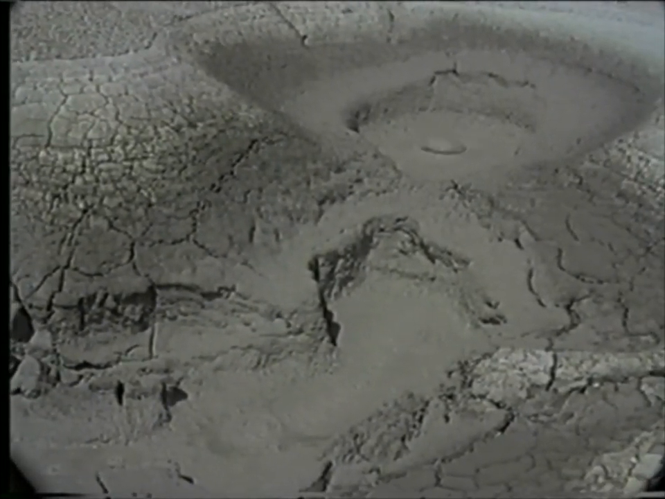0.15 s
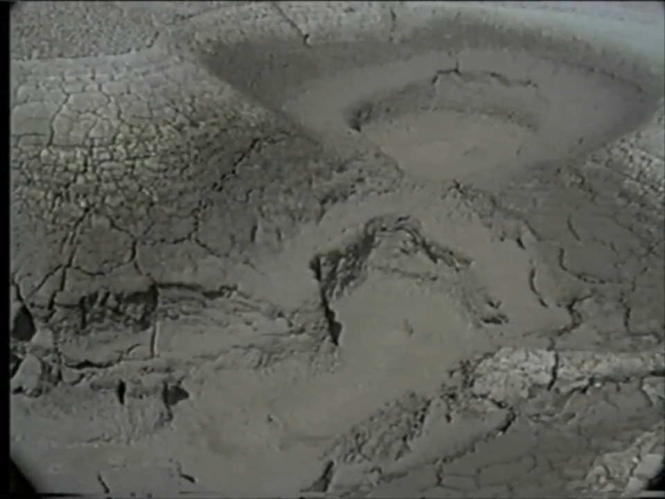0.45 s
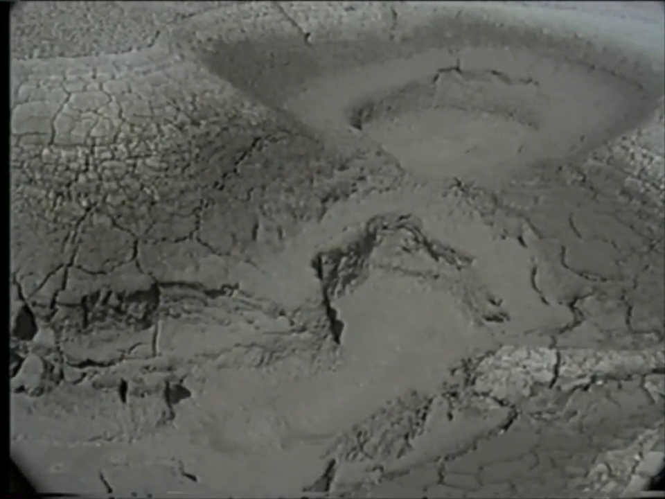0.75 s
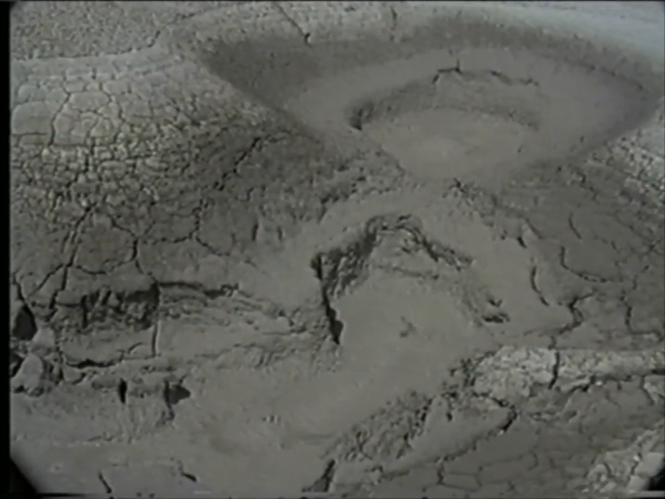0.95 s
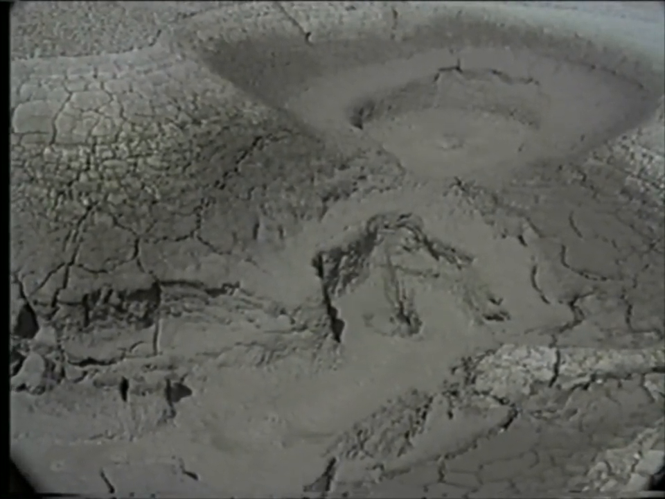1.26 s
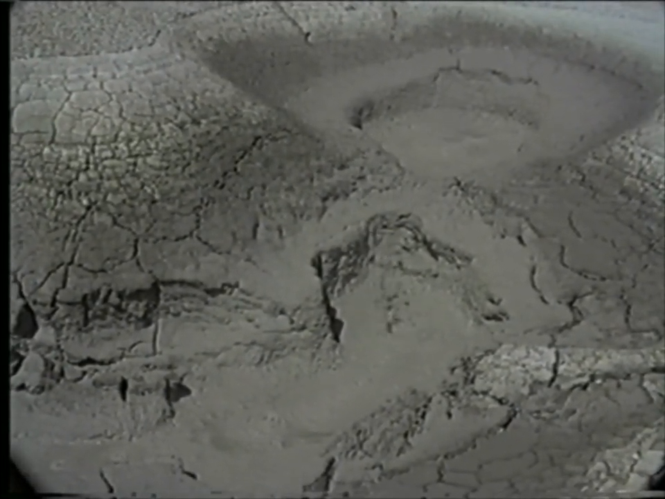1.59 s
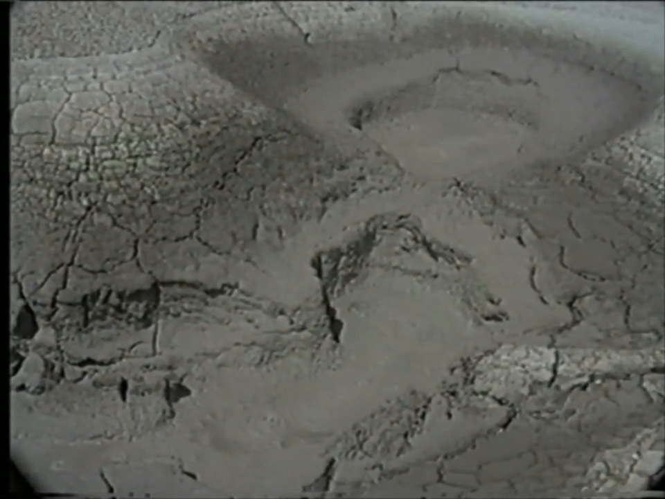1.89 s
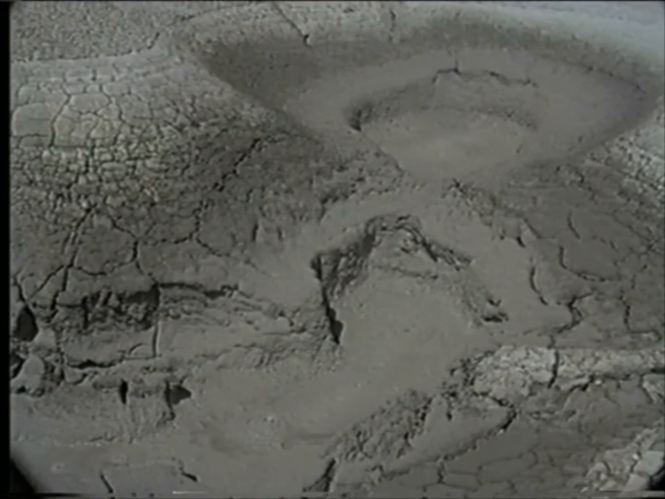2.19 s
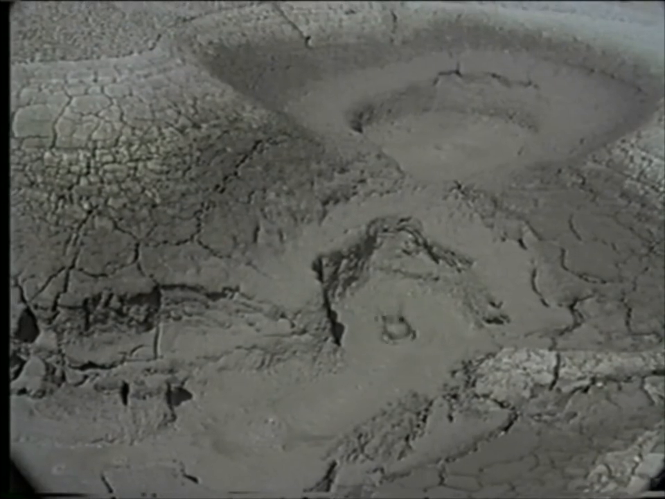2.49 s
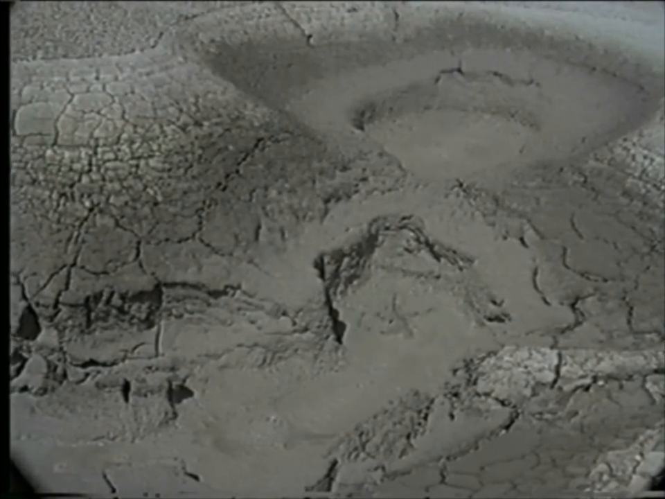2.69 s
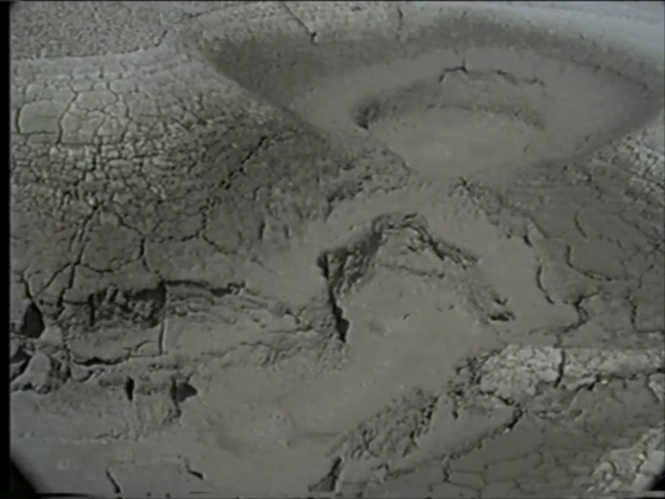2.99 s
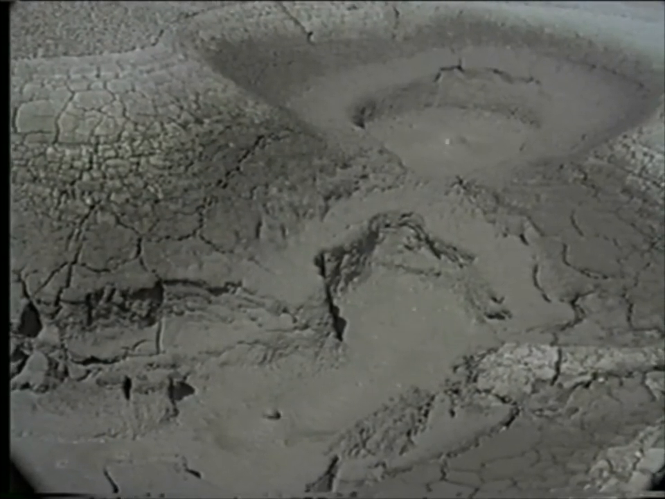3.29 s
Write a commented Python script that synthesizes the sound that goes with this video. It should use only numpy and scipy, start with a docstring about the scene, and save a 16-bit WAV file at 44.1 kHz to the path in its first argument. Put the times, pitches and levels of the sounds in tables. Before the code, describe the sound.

Bubbling mud pot gurgles, plops and splatters outdoors over wind rumble and a faint low hum

```python
"""A low steady hum and faint distant hiss, then short hollow plops: thick mud bubbling in a pot in the open air.
Plops are sagging damped tones with wet noise; snapping skins are short high rings with droplet spray.
Slaps are damped pulses with splashes; gurgle, surge, churn and froth are crowds of tiny ringing bubbles.
Wind on the microphone is shaped noise plus single thumps; hum is sines, air and hiss are coloured noise."""
import sys
import numpy as np
from scipy import signal
from scipy.fft import rfft, irfft, next_fast_len
from scipy.io import wavfile
from scipy.ndimage import uniform_filter1d

SR = 44100
rng = np.random.default_rng(int(sys.argv[2]) if len(sys.argv) > 2 else 0)


def log_audio(samples):
    """Write samples as a 16-bit WAV file to the path given in sys.argv[1]."""
    # one column per channel
    frames = np.atleast_2d(samples).T
    # limit to full scale, then quantise
    limited = np.clip(frames, -1, 1)
    pcm = np.round(limited * 32767).astype(np.int16)
    wavfile.write(sys.argv[1], SR, pcm)


N = 152145
T = np.arange(N) / SR
EVENT_T = T[:SR // 8]   # time axis of one short event


def from_db(db):
    """Decibels to gain."""
    return 10 ** (np.asarray(db) / 20)


def rms_one(x):
    """Scale to unit rms."""
    return x / np.sqrt(np.mean(x ** 2) + 1e-20)


def level(rows):
    """Gain over time, interpolated in dB between (s, dB) rows."""
    times_s, levels_db = np.transpose(rows)
    return from_db(np.interp(T, times_s, levels_db))


def colour(x, points):
    """Causal minimum-phase filter through (Hz, dB) points, by folding the cepstrum; rms 1."""
    size = 2 * next_fast_len(N)
    hz, db = np.transpose(points)
    grid_hz = np.maximum(np.arange(size // 2 + 1) * SR / size, 1)
    gain = from_db(np.interp(np.log(grid_hz), np.log(hz), db))
    cepstrum = irfft(np.log(gain))
    cepstrum[1:size // 2] *= 2
    cepstrum[size // 2 + 1:] = 0
    response = np.exp(rfft(cepstrum))
    return rms_one(irfft(rfft(x, size) * response)[:N])


def resonate(x, hz, width_hz):
    """Two-pole band-pass; a narrower width rings longer."""
    r = np.exp(-np.pi * width_hz / SR)
    zeros = [(1 - r * r) / 2, 0, (r * r - 1) / 2]
    poles = [1, -2 * r * np.cos(2 * np.pi * hz / SR), r * r]
    return signal.lfilter(zeros, poles, x + 1e-18)


def even(x, window_s):
    """Hold a texture near unit rms over a short window."""
    power = uniform_filter1d(x * x, max(int(window_s * SR), 2))
    return x / np.sqrt(np.abs(power) + 1e-6)


def add(out, s, sound):
    """Mix a sound in at a time in seconds."""
    i = max(int(s * SR), 0)
    out[i:i + len(sound)] += sound[:N - i]


def burst(t, rise_s, t60_s):
    """Smooth rise, then exponential decay."""
    rise = np.sin(np.pi / 2 * np.minimum(t / rise_s, 1)) ** 2
    return rise * from_db(-60 * np.maximum(t - rise_s, 0) / t60_s)


def grains(per_s, cycles, spread_db, low_hz, high_hz, count=24):
    """Tiny bubbles at random times, dealt among pitches; each falls 60 dB in the given cycles."""
    sizes = from_db(spread_db * np.minimum(rng.exponential(1, N), 4)) * rng.choice([-1, 1], N)
    clicks = sizes * (rng.random(N) < per_s / SR)
    dealt = rng.integers(0, count, N)
    out = np.zeros(N)
    for k, hz in enumerate(np.geomspace(low_hz, high_hz, count)):
        width_hz = np.log(1000) / np.pi * hz / cycles
        out += resonate(clicks * (dealt == k), hz, width_hz)
    return out


def wet_band(size, hz, width):
    """Noise around a pitch, dull on top, rms 1; width is a share of the pitch."""
    band = resonate(rng.standard_normal(size), hz, width * hz)
    dull = signal.butter(2, min(2 * hz, SR / 3), fs=SR, output="sos")
    return rms_one(signal.sosfilt(dull, band))


# Cavities opening. Each row: start in seconds, level in dB before PLOP_TRIM_DB, mid pitch in Hz, length in seconds.
PLOP_EVENTS = [(0.159,-41.5,1070,0.0074),(0.168,-40.5,900,0.0066),(0.235,-39,300,0.011),(.330,-39,358,0.016),(0.463,-43,370,0.01),(0.553,-38,480,0.014),(0.573,-38,668,.016),
               (.586,-39.5,695,0.0096),(0.598,-37,513,0.015),(0.605,-45,1150,0.0071),(0.623,-37,360,0.034),(0.664,-41.5,460,0.022),(0.699,-43,985,0.017),(0.717,-44,988,0.015),(0.837,-42.5,740,0.0084),(0.868,-43.5,836,0.011),(0.894,-42.5,634,0.035),(0.932,-43,990,0.0051),(0.971,-39.5,1024,0.0079),
               (1.054,-50,810,0.007),(1.213,-51,1530,.01),(1.106,-41.5,520,0.0076),(1.287,-43.5,995,0.0071),(1.522,-51.5,1344,.016),(1.781,-47,496,0.043),(1.798,-47,324,0.023),
               (1.843,-38.5,790,0.0084),(1.863,-38.5,1130,0.013),(1.872,-36,610,0.017),(1.8895,-31,1007,0.011),(1.902,-44,1000,0.0065),(1.9076,-37,986,0.016),(1.929,-47.5,595,0.02),(2.001,-46.5,1500,0.015),(2.162,-43.5,444,0.012),
               (2.230,-49,506,0.016),(2.236,-39,617,0.012),(2.263,-35,1120,0.0044),(2.276,-34.5,1040,0.0037),(2.339,-41.5,700,0.0047),
               (2.401,-33.5,320,0.023),(2.443,-34.5,592,0.0083),(2.537,-36,540,0.0056),(2.55,-37,395,0.0088),(2.558,-36,816,0.0058),(2.568,-40,880,0.0089),(2.584,-31,1000,0.006),(2.594,-48,720,.008),
               (2.64,-42,376,0.014),(2.696,-41,375,0.017),(2.708,-33.5,350,0.015),(2.725,-40,577,.014),(2.735,-38.5,370,0.015),
               (2.792,-50,1000,0.018),(2.814,-44,279,.02),(2.817,-49,560,0.014),(2.881,-49,1330,0.0078),(2.967,-49,990,.009),(3.133,-37.5,300,0.0087)]
PLOP_TRIM_DB = -3.5
PLOP_RISE, PLOP_SAG = 0.45, 0.16   # shares of the length and of the pitch
SQUELCH_DB, SQUELCH_WIDTH = -10, 0.55   # rough part, re tone; bandwidth over pitch
SMACK_DB, SMACK_RATIO, SMACK_FROM_HZ = -16, 1.27, 295   # wet noise, re tone; centre over pitch; lowest centre
TAIL_DB, TAIL_T60_S = -18, 0.05


def plops():
    """Each cavity swells with wet noise around its tone, sags in pitch and is choked by the mud; a rough tail stays."""
    out, t = np.zeros(N), EVENT_T
    for s, db, hz, length_s in PLOP_EVENTS:
        age = t / length_s
        pitch_hz = hz * (1 - PLOP_SAG * (np.minimum(age, 1) - 0.5))
        tone = np.sin(2 * np.pi * np.cumsum(pitch_hz) / SR)
        squelch = wet_band(len(t), hz, SQUELCH_WIDTH)
        smack = wet_band(len(t), max(SMACK_RATIO * hz, SMACK_FROM_HZ), 0.48)
        swell = np.sin(np.pi / 2 * np.minimum(age / PLOP_RISE, 1))
        choke = np.exp(-2 * age ** 4)
        ring = swell * choke * (tone + from_db(SQUELCH_DB) * squelch + from_db(SMACK_DB) * smack)
        tail = from_db(TAIL_DB) * burst(t, length_s, TAIL_T60_S) * squelch
        add(out, s, from_db(db + PLOP_TRIM_DB) * (ring + tail))
    return out


# Skins snapping. Each row: start in seconds, ring level in dB before RING_TRIM_DB, ring pitch in Hz,
# spray level in dB before SPRAY_TRIM_DB, spray t60 in seconds.
SNAP_EVENTS = [(.179,-52,2940,-60,0.15),(0.4902,-42.5,3200,-47,0.0081),(1.114,-56,3380,-55,0.022),(1.268,-66,4960,-54,.05),(0.602,-39.5,3040,-52,0.021),(1.475,-54,5000,-54,0.062),
               (1.6462,-69,2940,-47.5,0.046),(1.7948,-45,5750,-48.5,0.058),(1.839,-61,2880,-42,0.095),(1.8639,-40.5,4480,-39,0.0065),
               (2.002,-64,2630,-47,0.15),(2.094,-41,1290,-50.5,0.064),(2.159,-48,5700,-50,0.031),
               (2.2093,-44,5400,-46,0.04),(2.348,-58,2940,-47,0.19),(2.3929,-21.5,2310,-38.5,0.058),
               (2.449,-44.5,5860,-39.5,0.032),(2.465,-57,2850,-50.5,0.055),(2.484,-48,5140,-53,0.14),(2.525,-40,2660,-49.5,0.14),
               (2.636,-33,3170,-50,0.24),(2.711,-53,3520,-49,0.055),(2.751,-44,2180,-48.5,0.081),(2.822,-47.5,2520,-58,0.086),(3.045,-60,3030,-54.5,0.068),(3.109,-48,2100,-52,0.13)]
# Spectrum of droplets and froth. Each row: frequency in Hz, relative level in dB.
DROPLET_COLOUR = [(300,-20),(900,6.5),(2000,0.5),(3000,1.5),(3600,-6),(4400,-3.5),(5000,-7.5),(5800,-3.5),(7000,-10.5),(8200,-23.5),(10000,-17),(15000,-45)]
RING_TRIM_DB, SPRAY_TRIM_DB = -2.5, -3.5
SNAP_RISE_S, RING_T60_S = 0.0011, 0.0071


def snaps():
    """A skin tears with a very short high ring and a spray of droplets."""
    out, spray_level, t = np.zeros(N), np.zeros(N), EVENT_T
    for s, ring_db, hz, spray_db, spray_t60_s in SNAP_EVENTS:
        ring = burst(t, SNAP_RISE_S, RING_T60_S) * np.sin(2 * np.pi * hz * t)
        add(out, s, from_db(ring_db + RING_TRIM_DB) * ring)
        add(spray_level, s, from_db(spray_db + SPRAY_TRIM_DB) * burst(t, SNAP_RISE_S, spray_t60_s))
    droplets = colour(grains(9000, 5.5, 1, 540, 11100), DROPLET_COLOUR)
    return out + spray_level * even(droplets, 0.054)


# Mud slapping down. Each row: start in seconds, pulse level in dB, pulse pitch in Hz,
# splash level in dB, splash t60 in seconds.
SLAP_EVENTS = [(.1628,-46,900,-61,0.026),(.210,-44,1400,-58,0.017),(0.346,-46.5,1620,-71,0.035),(1.094,-43.5,1600,-57,.02),(1.179,-43.5,1380,-73,.04),(1.239,-48,2030,-52.5,0.036),(1.7947,-42,1500,-51,.015),(1.8402,-36,1150,-51,.1),(2.162,-45,1130,-57,0.058),(2.21,-53,1200,-69,0.013),(2.2286,-36,1930,-54,0.028),(2.2579,-28,1160,-51,.01),(2.289,-44,1290,-61,.01),
               (2.5605,-37,1290,-56,.015),(2.5775,-35,1150,-59,0.0092),(2.6043,-33,970,-50,.007),(2.6373,-26,1900,-43,.09),(2.69,-50,1100,-52.5,0.073),(3.048,-41,1240,-57,.05)]
# Splash spectrum. Each row: frequency in Hz, relative level in dB.
SPLASH_COLOUR = [(200,-58),(450,-3.5),(1000,12),(1400,3.5),(1900,9.5),(2400,10),(3300,-7),(3900,-5),(6500,-15),(15000,-62)]
PULSE_T60_CYCLES, SPLASH_RISE_S = 9.2, 0.0029


def slaps():
    """Lumps land with one hard, heavily damped pressure pulse and a short wet splash."""
    out, splash_level, t = np.zeros(N), np.zeros(N), EVENT_T
    for s, pulse_db, hz, splash_db, splash_t60_s in SLAP_EVENTS:
        quarter_cycle_s = 1 / (4 * hz)
        pulse = burst(t, quarter_cycle_s, PULSE_T60_CYCLES / hz) * np.sin(2 * np.pi * hz * t)
        add(out, s, from_db(pulse_db) * pulse)
        add(splash_level, s, from_db(splash_db) * burst(t, SPLASH_RISE_S, splash_t60_s))
    splash = colour(grains(6000, 11.5, 3.7, 278, 5100), SPLASH_COLOUR)
    return out + splash_level * even(splash, 0.004)


# Gas pushing through the mud. Each row: time in seconds, level in dB.
GURGLE_LEVEL = [(0,-62.5),(.28,-69),(.34,-59.5),(.40,-65),(.5,-52),(.6,-51),(.71,-56),(.9,-67),(1.6,-85),(3.45,-63.5)]


def gurgle():
    """A run of larger bubbles under the first surge, long-ringing and dull."""
    bubbles = rms_one(grains(per_s=390, cycles=18, spread_db=-1.5, low_hz=300, high_hz=685))
    dull = signal.butter(2, 1100, fs=SR, output="sos")
    return level(GURGLE_LEVEL) * even(signal.sosfilt(dull, bubbles), 0.068)


# A long dense surge of sloshing mud. Each row: time in seconds, level in dB.
SURGE_LEVEL = [(0,-68),(.4,-67.5),(.52,-54),(.6,-48),(.67,-51.5),(.72,-49),(.81,-53),(.88,-47.5),(1.0,-62),(1.25,-58),(1.35,-68.5)]
# Its spectrum. Each row: frequency in Hz, relative level in dB.
SURGE_SPECTRUM = [(150,-14),(300,2),(550,-2.5),(1000,-5.5),(1350,-9.5),(1850,-11),(2400,-14),(2750,-23.5),(3100,-16.5),(3700,-25.5),(6000,-32),(8000,-44),(15000,-44)]


def surge():
    """So many small bubbles at once that they merge into a lumpy wet wash."""
    bubbles = grains(per_s=3200, cycles=6.7, spread_db=2.2, low_hz=256, high_hz=7330, count=40)
    return level(SURGE_LEVEL) * even(colour(bubbles, SURGE_SPECTRUM), 0.03)


# Close churning of the mud. Each row: time in seconds, level in dB.
CHURN_LEVEL = [(0,-68),(1.75,-64.5),(1.8,-54.5),(1.88,-52.5),(1.97,-64.5),(2.13,-61),(2.25,-47.5),(2.32,-55),(2.41,-47.5),(2.49,-55),(2.58,-43),(2.675,-57),(2.72,-53.5),(2.78,-58.5),(2.93,-64.5),(3.45,-75.5)]
# Its spectrum. Each row: frequency in Hz, relative level in dB.
CHURN_SPECTRUM = [(150,5.5),(300,6),(550,4),(1000,0),(1350,-1.5),(1900,-6),(2700,-15.5),(3100,-12.5),(3700,-19),(6000,-37),(8000,-39),(15000,-29.5)]
# Fine crackle of bursting froth. Each row: time in seconds, level in dB.
FROTH_LEVEL = [(0,-79),(.45,-89),(.59,-61),(.72,-76),(1.0,-81),(1.27,-74),(1.36,-79),(1.55,-72),(1.74,-77),(1.87,-64.5),(2.15,-71.5),(2.35,-70),(2.6,-58),(2.68,-76),(2.84,-63.5),(2.92,-84.5),(3.45,-79)]


def churn():
    """Splattering mud close by, with fine froth on top: two crowds of grains, the froth higher and sparser."""
    mud_grains = grains(per_s=1200, cycles=6.3, spread_db=1, low_hz=225, high_hz=7700, count=32)
    froth_grains = grains(per_s=750, cycles=9, spread_db=3.6, low_hz=2280, high_hz=10200)
    mud = even(colour(mud_grains, CHURN_SPECTRUM), 0.064)
    froth = even(colour(froth_grains, DROPLET_COLOUR), 0.36)
    return level(CHURN_LEVEL) * mud + level(FROTH_LEVEL) * froth


# Wind on the microphone. Each row: time in seconds, rumble level in dB.
GUST_LEVEL = [(0,-72),(.21,-59),(.24,-37),(.38,-38.5),(.54,-40),(.6,-34),(.71,-44),(.76,-39),(.88,-35),(.97,-41),(1.35,-40),(1.39,-46),(1.42,-38.5),(1.56,-52),(1.64,-40.5),(1.71,-42),(1.78,-40),(1.86,-50.5),
              (2.12,-50.5),(2.17,-44),(2.3,-46.5),(2.42,-41.5),(2.5,-55),(2.7,-65),(2.94,-57.5),(2.985,-44),(3.045,-48.5),(3.09,-46),(3.25,-59.5),(3.45,-62.5)]
# Rumble spectrum. Each row: frequency in Hz, relative level in dB.
RUMBLE_COLOUR = [(20,-15.5),(40,0.5),(65,-2.5),(95,1.5),(125,-4.5),(165,-9),(220,-15),(320,-25),(500,-47),(1000,-89),(3000,-71.5)]
RUMBLE_HOLD_S = 0.0363
FLUTTER_HZ, FLUTTER_WIDTH_HZ = 150, 62.6
FLUTTER_DB, GUST_REF_DB = -48, -37.5   # flutter level when the gust is at the reference
FLUTTER_GROWTH = 3.27   # dB of flutter per dB of gust


def wind():
    """Low lumpy buffeting that follows the gusts; strong gusts flutter higher."""
    gust = level(GUST_LEVEL)
    rumble = even(colour(rng.standard_normal(N), RUMBLE_COLOUR), RUMBLE_HOLD_S)
    narrow = resonate(rng.standard_normal(N), FLUTTER_HZ, FLUTTER_WIDTH_HZ)
    flutter = even(rms_one(resonate(narrow, FLUTTER_HZ, 2 * FLUTTER_WIDTH_HZ)), 0.18)
    flutter_level = from_db(FLUTTER_DB) * (gust / from_db(GUST_REF_DB)) ** FLUTTER_GROWTH
    return gust * rumble + flutter_level * flutter


# Single hard buffets. Each row: centre in seconds, envelope peak in dB, pitch in Hz.
BUFFET_EVENTS = [(0.237,-30.5,71.5),(.325,-30.5,144),(.606,-33,162),(0.757,-27.5,70),(1.173,-30,74.4),(1.291,-27,86),(1.355,-27,67),(1.779,-31,77),(3.05,-34,60.5)]
BUFFET_CYCLES = 0.67   # from the centre until the envelope is down to 1/e


def buffets():
    """Eddies hit the microphone as thumps of a cycle or two, under a bell-shaped envelope."""
    out, t = np.zeros(N), EVENT_T - 1 / 16   # zero at the thump's centre
    for s, db, hz in BUFFET_EVENTS:
        envelope = np.exp(-(t * hz / BUFFET_CYCLES) ** 2)
        wave = np.cos(2 * np.pi * (hz * t + rng.random()))
        add(out, s + t[0], from_db(db) * envelope * wave)
    return out


# Distant steam spectrum. Each row: frequency in Hz, relative level in dB.
AIR_COLOUR = [(70,-6.5),(140,1),(220,-6.5),(400,-12),(700,-12),(1000,-11),(1600,-23),(2000,-31),(2700,-23.5),(3600,-33.5),(4300,-31),(8000,-35),(15500,-45.5)]
# Thin hiss spectrum. Each row: frequency in Hz, relative level in dB.
HISS_COLOUR = [(2000,-10.5),(5000,2.5),(9500,3.5),(13000,1.5),(15500,-8)]
# Hum partials. Each row: frequency in Hz, rms level in dB.
HUM_PARTIALS = [(59.2,-54),(129.2,-63.5),(177.6,-71),(236.9,-74)]
AIR_DB, HISS_DB, HISS_SWELL_S = -62, -77, 0.35   # air level before its high-pass


def background():
    """Distant steam and a thin hiss that swells in, both coloured noise, and a low hum of sines."""
    high_pass = signal.butter(2, 70, "high", fs=SR, output="sos")
    air = signal.sosfilt(high_pass, colour(rng.standard_normal(N), AIR_COLOUR))
    hiss = colour(rng.standard_normal(N), HISS_COLOUR) * np.minimum(T / HISS_SWELL_S, 1)
    hum = np.zeros(N)
    for hz, db in HUM_PARTIALS:
        hum += np.sqrt(2) * from_db(db) * np.sin(2 * np.pi * (hz * T + rng.random()))
    return from_db(AIR_DB) * air + from_db(HISS_DB) * hiss + hum


def scene():
    """The mud pot in the wind, one channel."""
    mud = plops() + snaps() + slaps() + gurgle() + surge() + churn()
    return (mud + wind() + buffets() + background())[None]


CUTOFF_HZ = 15700


def record(dry):
    """The top is cut steeply by an elliptic low-pass."""
    low_pass = signal.ellip(12, 0.1, 70, CUTOFF_HZ, fs=SR, output="sos")
    return signal.sosfilt(low_pass, dry)


dry = scene()
out = record(dry)
log_audio(out)
```